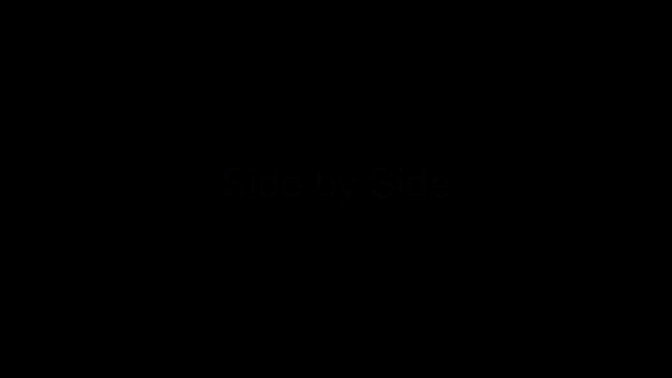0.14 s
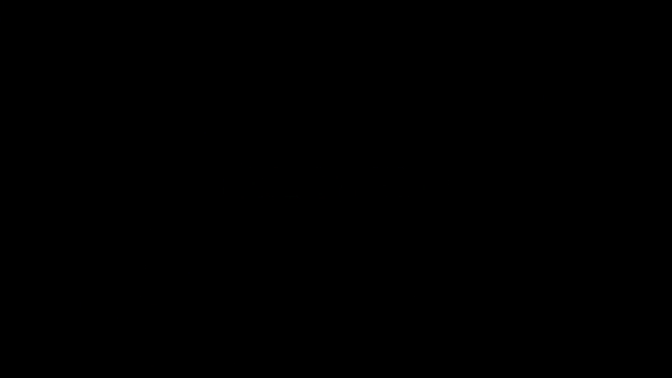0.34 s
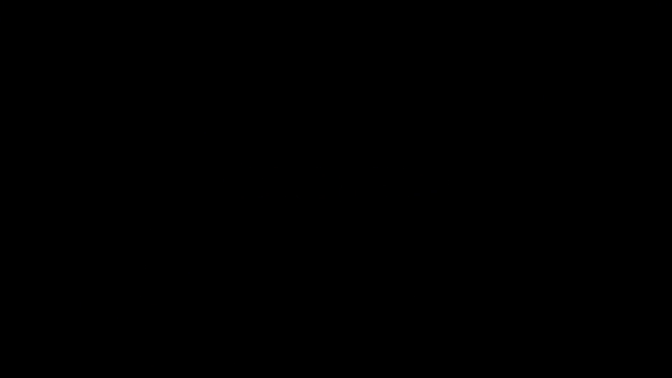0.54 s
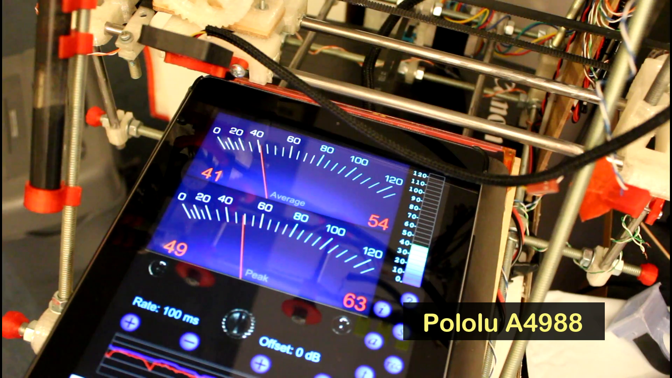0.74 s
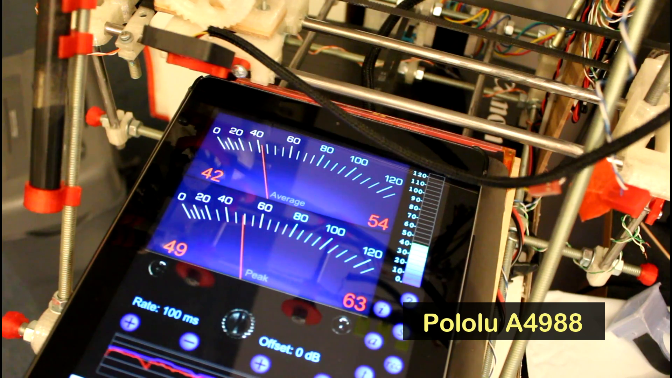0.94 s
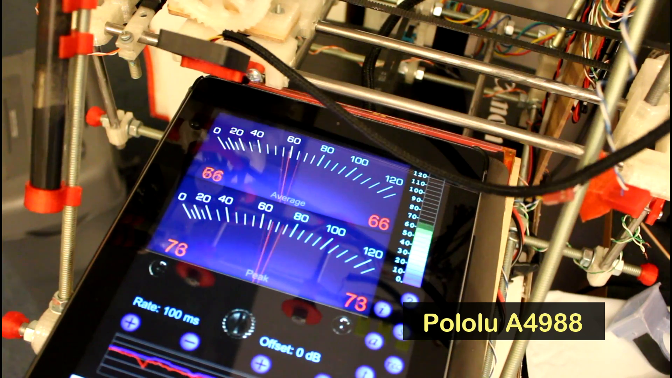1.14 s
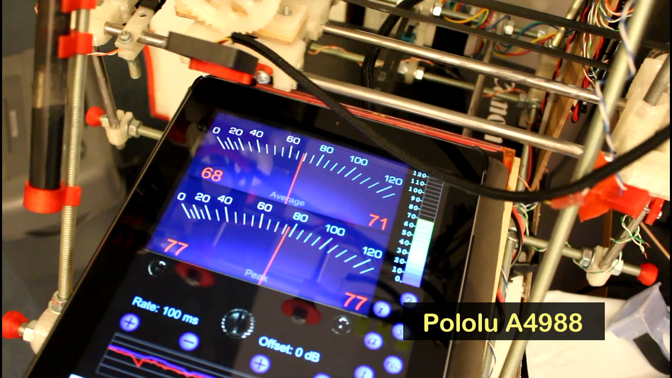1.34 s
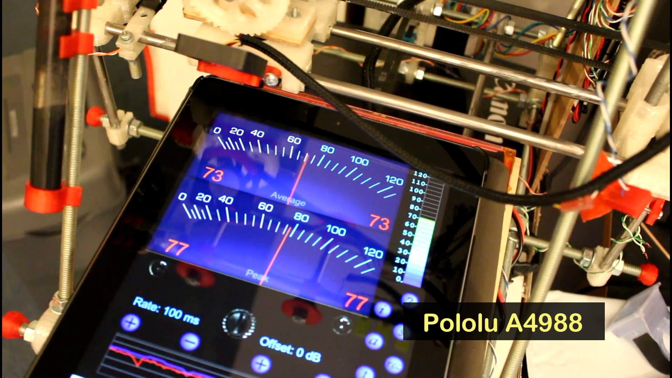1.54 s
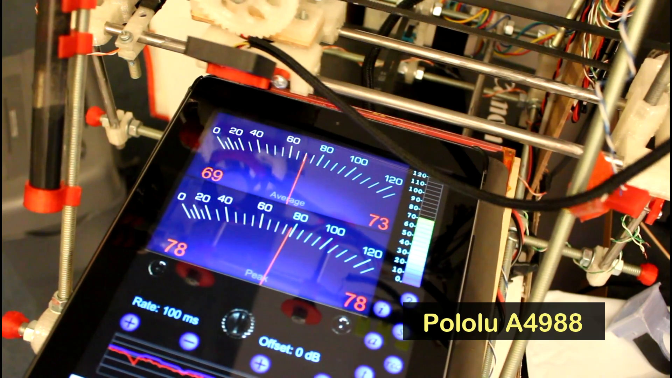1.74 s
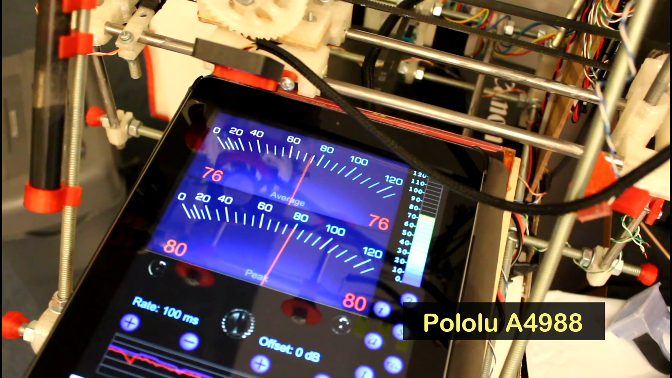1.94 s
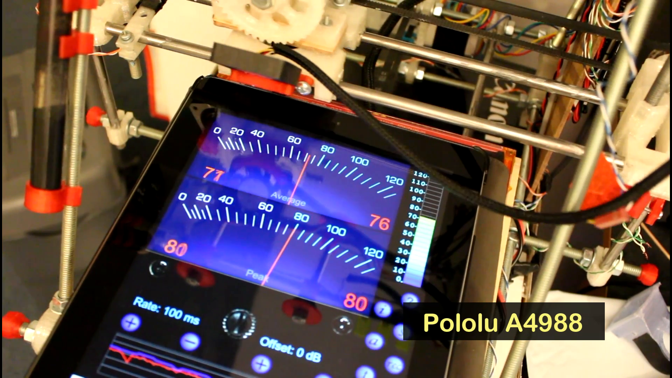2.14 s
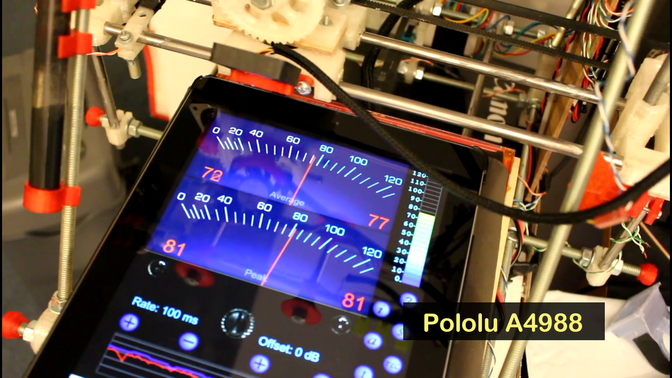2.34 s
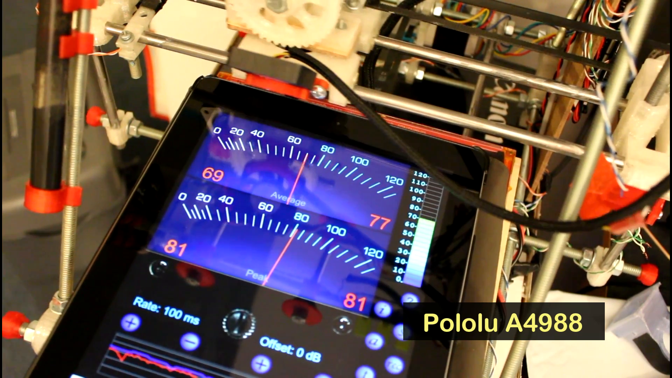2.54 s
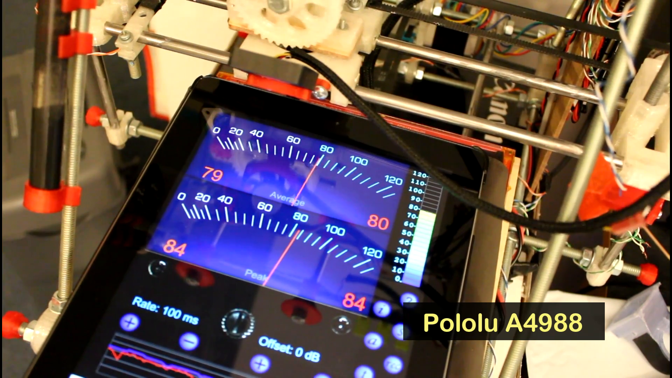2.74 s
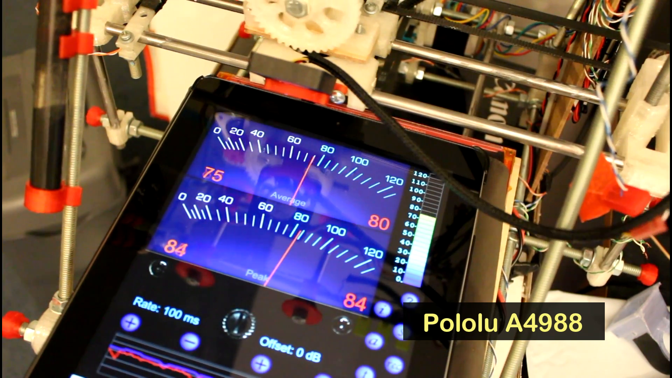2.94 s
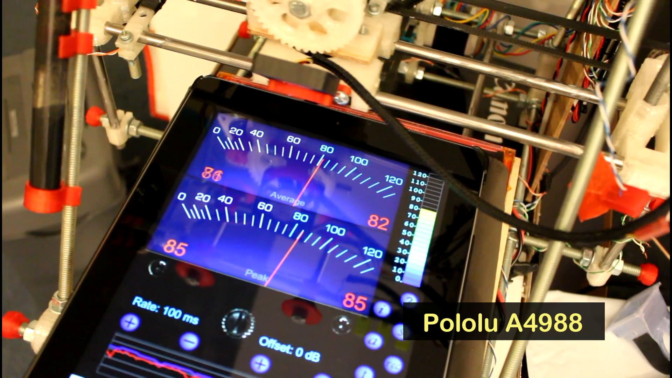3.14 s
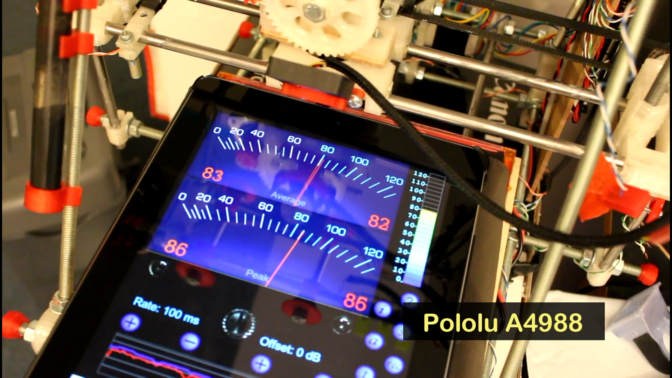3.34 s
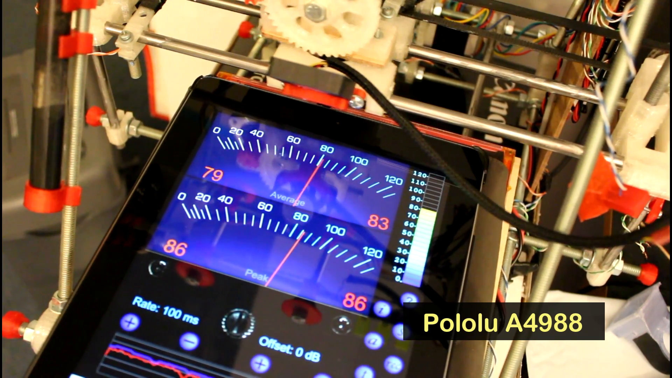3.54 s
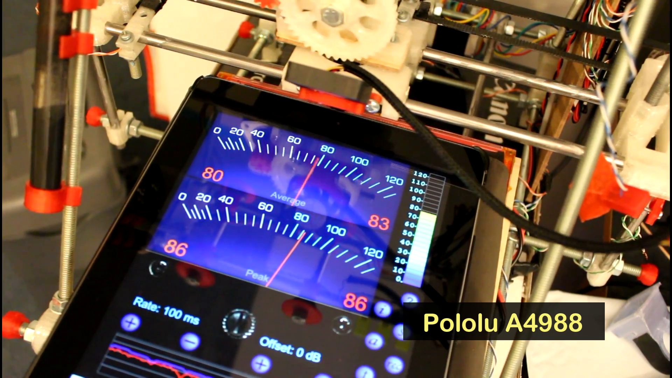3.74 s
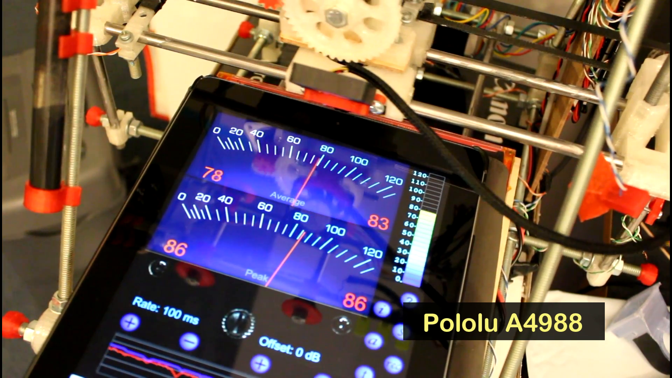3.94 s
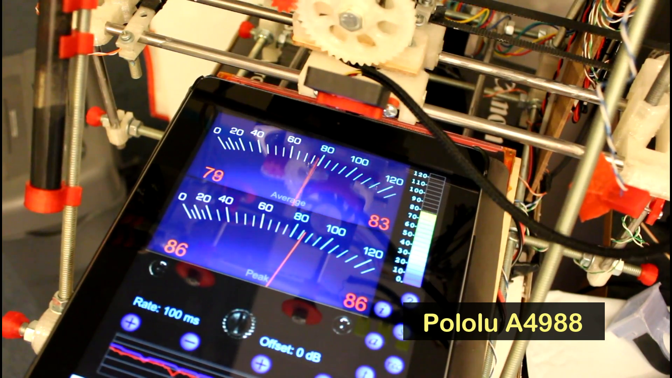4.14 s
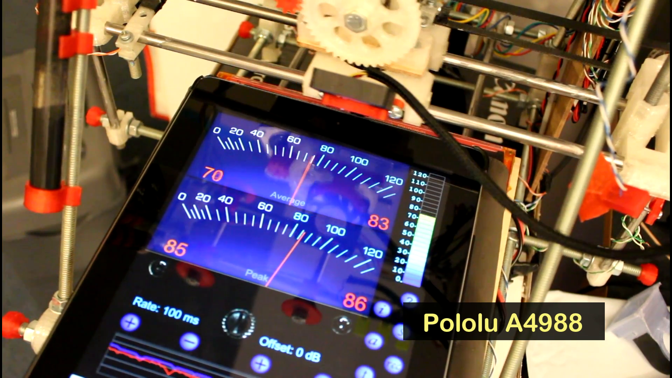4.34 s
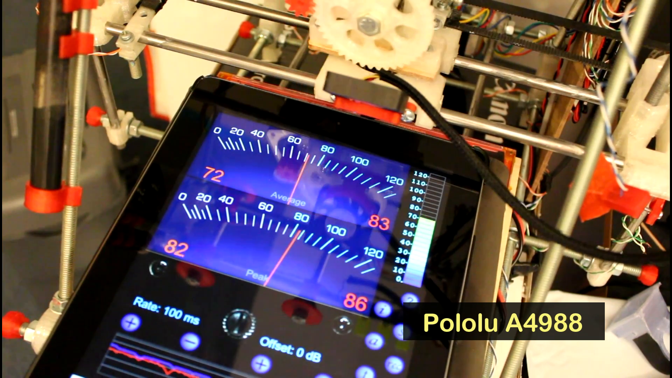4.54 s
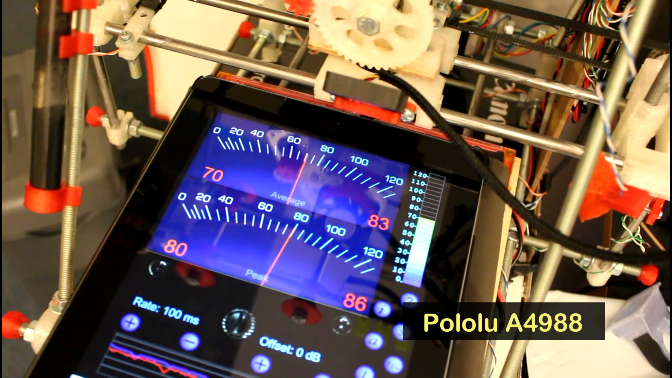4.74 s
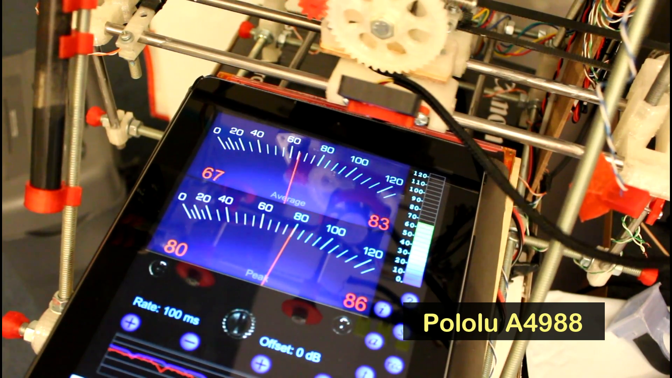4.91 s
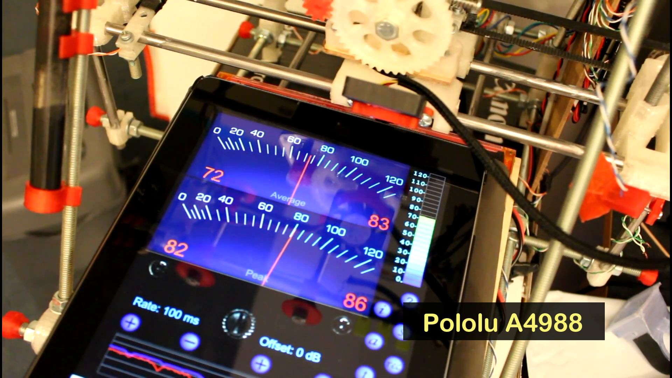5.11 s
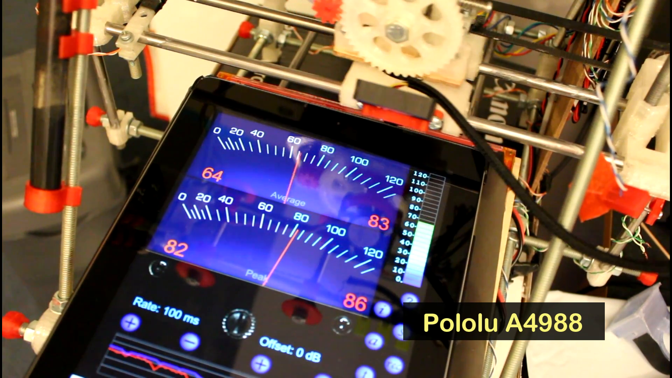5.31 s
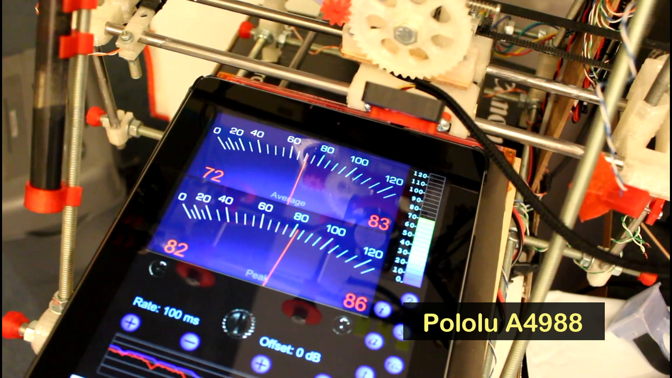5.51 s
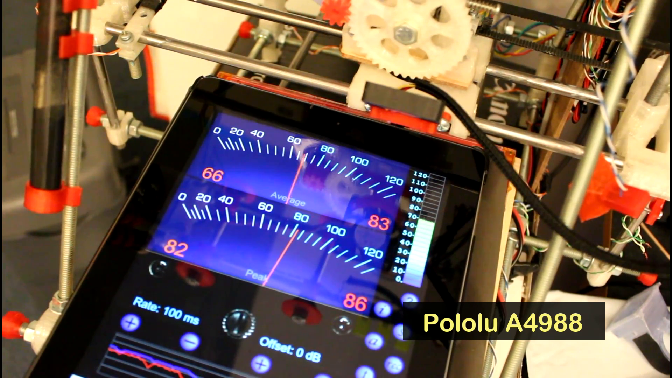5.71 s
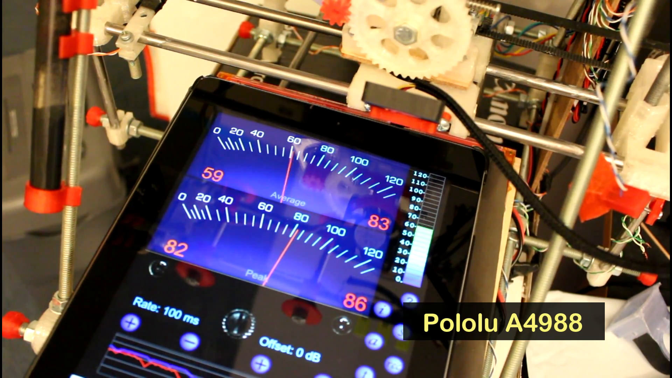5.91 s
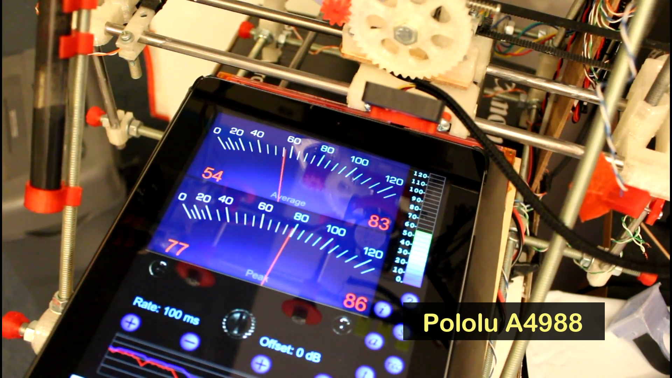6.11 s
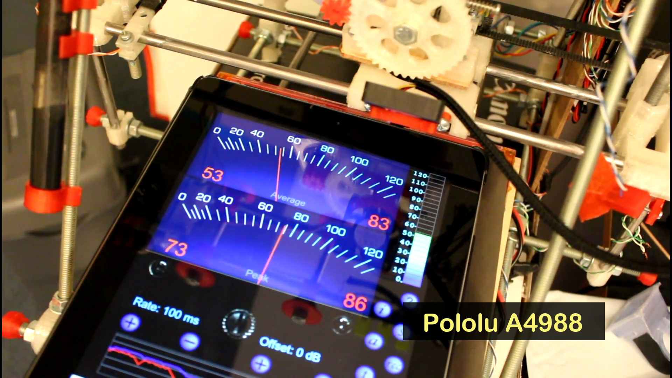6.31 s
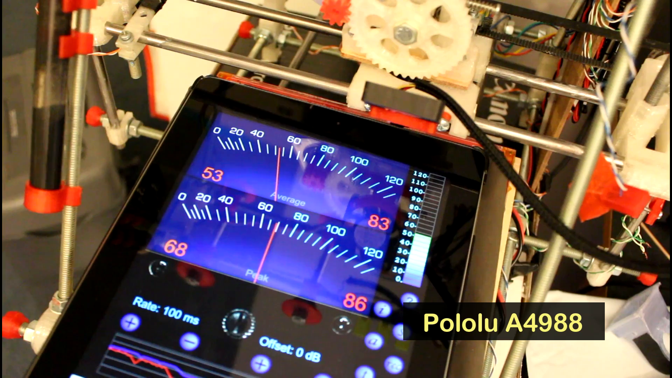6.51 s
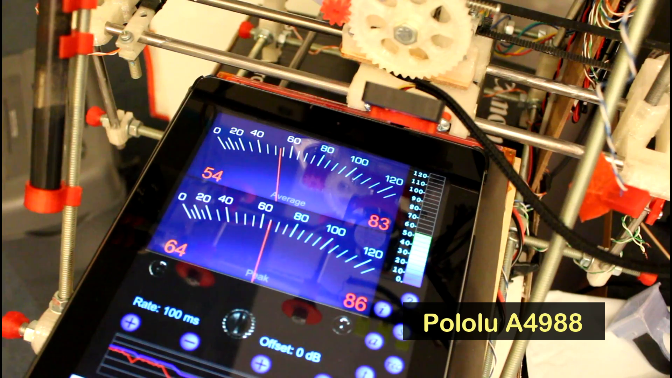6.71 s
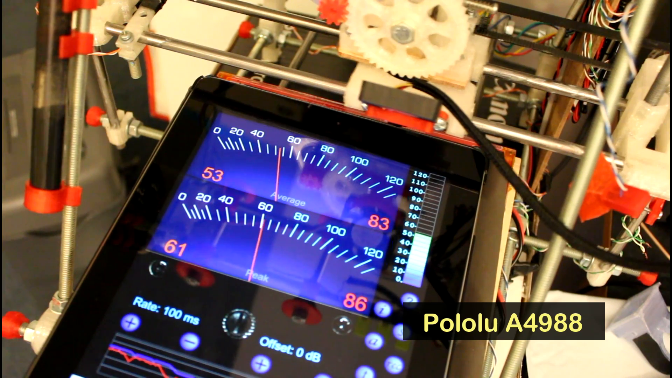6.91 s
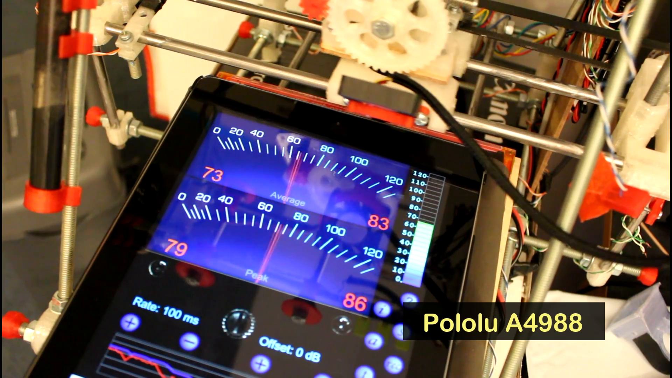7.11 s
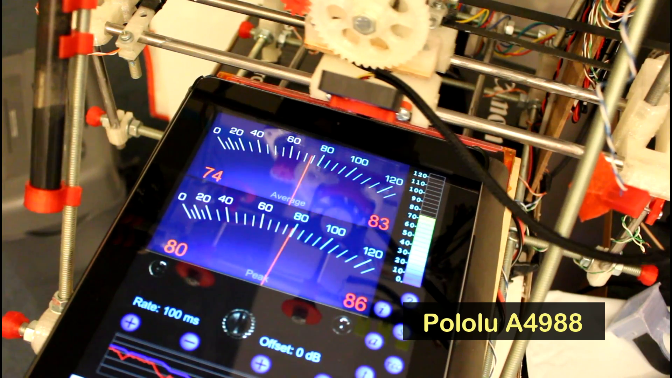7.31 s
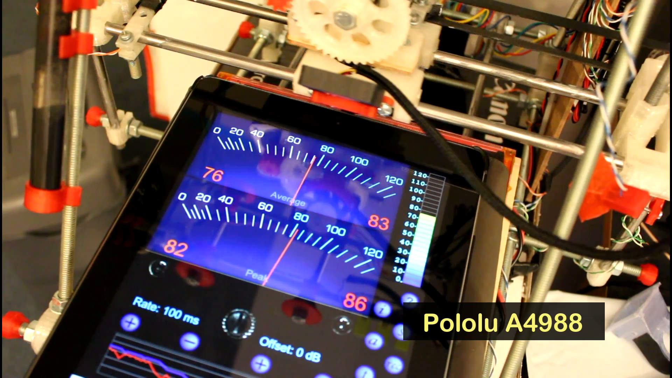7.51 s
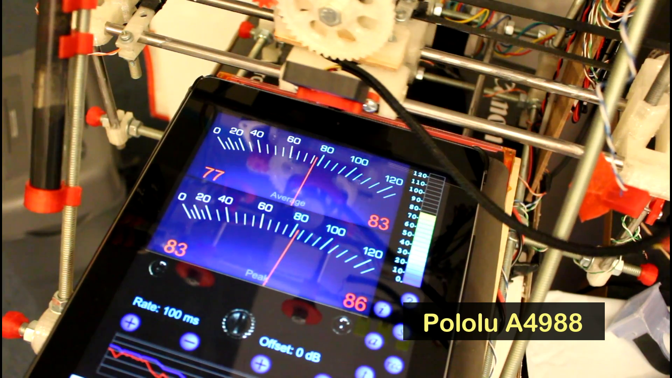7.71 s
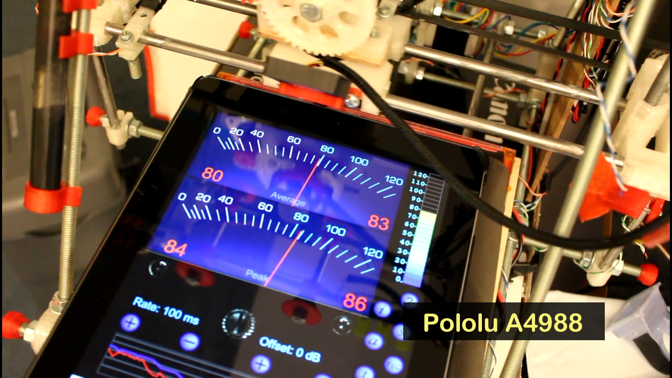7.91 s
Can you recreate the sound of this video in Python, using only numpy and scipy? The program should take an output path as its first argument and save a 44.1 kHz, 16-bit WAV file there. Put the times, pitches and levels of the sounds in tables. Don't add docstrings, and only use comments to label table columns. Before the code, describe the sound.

Abrupt quiet hum, a click and faint hiss, then a printer carriage buzzes in short nasal bursts, rests, and finally whines steadily to the end.

```python
import sys
import numpy as np
from scipy import signal
from scipy.fft import rfft, irfft, next_fast_len
from scipy.io import wavfile
from scipy.ndimage import uniform_filter1d, map_coordinates

SR = 44100
rng = np.random.default_rng(int(sys.argv[2]) if len(sys.argv) > 2 else 0)


def dump_mix(stems):
    frames = np.atleast_2d(stems).T
    limited = np.clip(frames, -1, 1)
    pcm = np.round(limited * 32767).astype(np.int16)
    wavfile.write(sys.argv[1], SR, pcm)


def amplitude_ratio(level_db):
    exponent = np.asarray(level_db, float) / 20
    return 10 ** exponent


N = 355446
T = np.arange(N) / SR

STEP_HZ = 277.55
RAMP_S = 0.044
SHORT_S = 0.215

# (start [s], step tone level [dB], its sag [dB], upper whine level [dB], rattle level [dB])
MOVES = [(1.008, -35, -1.5, 0, -47.5), (1.336, -35.5, -1, 0.5, -46.5), (1.706, -35.5, -1, 0, -46),
         (2.038, -33.5, 1, 2.5, -46), (2.443, -34, -1, 1, -44.5), (2.829, -35, -7.5, -2, -45),
         (3.201, -35, -6, -8, -45), (3.594, -34.5, -5.5, -3, -45), (3.98, -33.5, -9, -4, -44),
         (4.386, -34, -9, -4, -45), (4.845, -35, -8, -7, -45), (5.296, -37, -7, -6, -45.5),
         (6.962, -33.5, -8, -3, -45.5)]


def level(x, db):
    return x * amplitude_ratio(db) / np.sqrt(np.mean(x ** 2))


def curve(rows, column=1):
    rows = np.array(rows)
    return np.interp(T, rows[:, 0], rows[:, column])


def walk(rate):
    k = int(SR / rate)
    held = np.repeat(rng.standard_normal(N // k + 1), k)
    return 1.299 * uniform_filter1d(uniform_filter1d(held, k), k)[:N]


def ring(x, hz, t60):
    pole = np.exp((2j * np.pi * hz - np.log(1000) / t60) / SR)
    return signal.lfilter([1], [1, -pole], x).imag


def lag(x, tau_s):
    share = 1 / (tau_s * SR)
    return signal.lfilter([share], [1, share - 1], x)


def colour(x, points, peaks=()):
    size = next_fast_len(N)
    f = np.fft.rfftfreq(size, 1 / SR) + 1
    points = np.array(points)
    db = np.interp(np.log(f), np.log(points[:, 0]), points[:, 1])
    for hz, width, peak_db in peaks:
        db = db + peak_db / (1 + (2 * (f - hz) / width) ** 2)
    return irfft(rfft(x, size) * amplitude_ratio(db), size)[:N]


def spread(x, pan_db, wet_db, split_hz, t60):
    t = np.arange(SR // 5) / SR
    echo = rng.standard_normal((2, len(t))) * np.exp(-np.log(1000) * t / t60)
    echo = echo / np.sqrt(np.sum(echo[0] ** 2))
    echo = signal.lfilter(*signal.butter(2, split_hz, "high", fs=SR), echo)
    wet = signal.fftconvolve(x[None], echo, axes=1)[:, :N]
    return (x + amplitude_ratio(wet_db) * wet) * amplitude_ratio(np.array([[pan_db], [-pan_db]]) / 2)


def ramp_times():
    brake_lag_s = -0.003
    times = []
    for row in MOVES:
        times += [row[0], row[0] + SHORT_S + brake_lag_s]
    return times[:-1]


def move_now():
    rows = np.array(MOVES)
    latest = np.maximum(np.searchsorted(rows[:, 0], T) - 1, 0)
    rows = rows[latest].T
    return rows, np.maximum(T - rows[0], 0)


def motion():
    entry_share = 0.28
    belt_lag_s = 0.016
    command = np.zeros(N)
    for k, s in enumerate(ramp_times()):
        done = np.clip((T - s) / RAMP_S, 0, 1)
        jump = done >= 1 if k % 2 else done > 0
        command += (-1) ** k * ((1 - entry_share) * done + entry_share * jump)
    command = np.clip(command, 0, 1)
    speed = lag(command, belt_lag_s)
    pulses = np.cumsum(command * STEP_HZ) / SR
    steps = np.cumsum(speed * STEP_HZ * (1 + 0.0004 * walk(30))) / SR
    return command, pulses, speed, steps


def whine(speed, steps):
    # (multiple, level [dB], extra while settling [dB], climb [dB/s], share of the sag)
    main_lines = [(2, -50.5, 5, -4, -.5), (3, -52, -1.5, 5, .35), (4, -59.5, -3, 14, 0.054),
                  (5, -51.5, -3, 24, 0.52), (6, -55.5, -5, 9, .3), (7, -63, -2, -1, -0.018),
                  (8, -73, -5, 0, -0.061)]
    # (multiple, level [dB])
    weak_lines = [(9, -63), (10, -64), (11, -63), (12, -63), (13, -65), (14, -63), (15, -62), (17, -63),
                  (18, -66), (19, -66), (20, -65), (21, -65), (22, -68), (32, -78)]
    # (multiple, level [dB])
    quarter_lines = [(1.25, -60.5), (2.25, -62), (3.25, -67), (4.25, -72), (4.75, -59), (5.75, -78),
                     (10.25, -60.5), (18.25, -69)]

    def tone(k, db):
        return np.sqrt(2) * amplitude_ratio(db) * np.sin(2 * np.pi * (k * steps + rng.random()))

    (_, step_db, sag_db, upper_db, _), age = move_now()
    lock_s = 0.094 + 0.004 * sag_db
    lock_db = -13 * np.clip((lock_s - age) / 0.03, 0, 1)
    early = np.exp(-np.maximum(age - lock_s, 0) / 0.06)
    step_db = step_db + sag_db * (1 - early) + lock_db + 1.7 * walk(20)
    step = -np.sqrt(2) * amplitude_ratio(step_db) * np.cos(2 * np.pi * steps)

    climb_from_s, climb_to_s = 0.37, 0.79
    travel = np.clip(age, climb_from_s, climb_to_s) - climb_from_s
    span_hz = 2400 - 680 * age
    out = 0
    for k, db, early_db, climb, share in main_lines:
        k = round(k)
        db = db + early_db * early + climb * travel + share * sag_db + lock_db
        db = db + (k in (4, 6, 7, 8)) * upper_db
        span_db = (k > 6) * 15 / (1 + (2 * (k * STEP_HZ - span_hz) / 200) ** 2)
        out = out + tone(k, db + span_db + 1.06 * walk(12))

    build_db = 0.6 * (rattle_db() + 40.0)
    out += sum(tone(k, db + build_db + 1.8 * walk(5)) for k, db in weak_lines)
    quarters = sum(tone(k, db + 3.1 * walk(5.6)) for k, db in quarter_lines)
    out += lag(speed, 0.31) * quarters

    side_line_hz, side_line_start_s = 1362, 7.12
    side_line_db = -65 + 20.5 * (T - side_line_start_s)
    side_line = np.sqrt(2) * amplitude_ratio(side_line_db) * np.sin(2 * np.pi * side_line_hz * T) * (T > side_line_start_s)
    out = out * uniform_filter1d(speed ** 14, 300)
    return out + step * uniform_filter1d(speed ** 4, 300) + side_line


def microsteps(command, pulses):
    sag_db = move_now()[0][2]
    db = -64.5 - 0.8 * sag_db + 1.8 * walk(14)
    return np.sqrt(2) * amplitude_ratio(db) * np.sin(2 * np.pi * 16 * pulses) * command ** 7


def ramp_levels():
    # (near 170 Hz [dB], 279 Hz [dB], 342 Hz [dB], 402 Hz [dB], 1445 Hz [dB])
    start_peaks, start_scatter = (-38.5, -34.5, -46, -44.5, -49), (1.6, 0, 0, 0, 0.9)
    brake_peaks, brake_scatter = (-42.5, -22.5, -52, -47, -50.5), (2, .5, 1.5, 0, 1)
    # (start 279 Hz [dB], start 342 Hz [dB], start 402 Hz [dB], brake 402 Hz [dB])
    stances = [(2.5, 9, 0, 3.5), (-13, 1, 0, -8), (-12, 5.5, -17, 5), (6.5, -10, 2, -6),
               (-17, -2.5, -7, -2), (-7, 1.5, -3, -4), (3, -4, 4, 3.5), (-2, 0, -0.5, 0), (5, -7, 7, 2),
               (5.5, -1, -3.5, 4), (-16, 3.5, 4, -7), (2.5, 5, -3, 3.5), (3.5, -3.5, 6, 0)]
    chance = rng.standard_normal((2 * len(MOVES), 5)).clip(-2, 2)
    rule = np.array([[start_peaks, start_scatter], [brake_peaks, brake_scatter]] * len(MOVES))
    stance = []
    for a, b, c, d in stances:
        stance += [(0, a, b, c, 0), (0, 0, 0, d, 0)]
    return rule[:, 0] + rule[:, 1] * chance + stance


def frame(command, pulses, speed, steps):
    # (frequency [Hz], t60 [s], ramp level column [1-5], level against that column [dB])
    modes = [(171, 0.2, 1, -4.5), (219.6, 0.67, 1, -10), (278.8, 0.26, 2, -6.5), (340.8, 0.18, 3, 6),
             (397.3, 0.16, 4, 3.5), (483, 0.055, 4, -14), (590, 0.065, 4, -7), (775, 0.18, 5, -0.5),
             (974, 0.11, 5, 0), (1432, 0.11, 5, 2.5), (1445, 0.05, 5, -19), (4435, 0.13, 5, -6.5)]
    out, size = np.zeros(N + SR), SR // 3
    t = np.arange(size) / SR
    multiples = np.array([[1], [2], [3], [4], [6], [7]])
    weights = [1.0, 0.76, 0.85, 1.0, 0.55, 0.91]
    for s, row in zip(ramp_times(), ramp_levels()):
        now = slice(int(s * SR), int(s * SR) + size)
        phase = rng.random((6, 1))
        phase[0] = 0
        glide = np.sin(2 * np.pi * (multiples * steps[now] + phase))
        force = speed[now] ** 1.28 * np.dot(weights, glide)
        force += 1.5 * np.sin(2 * np.pi * 16 * pulses[now]) * (command[now] > 0)
        force += 12 * np.diff(rng.standard_normal(size), prepend=0)
        force *= np.clip(t / 0.0041, 0, 1) * np.clip((RAMP_S + 0.025 - t) / 0.017, 0, 1)
        for hz, t60, column, db in modes:
            y = ring(force, hz, t60)
            out[now] += y * amplitude_ratio(row[int(round(column)) - 1] + db) / np.abs(y).max()
    return signal.sosfilt(signal.butter(3, 85, "high", fs=SR, output="sos"), out[:N])


def shake(command):
    bench = [(40, -29), (90, 6.0), (300, 11.0), (600, -5.0), (1200, -17), (2000, -43)]  # (Hz, dB)
    changing = (command > 0) & (command < 1)
    jolt = lag(lag(changing, 0.0047), 0.054)
    return jolt * level(colour(rng.standard_normal(N), bench), -43.5)


def rattle_db():
    rows, age = move_now()
    rise = -6.5 * np.clip(1 - age / 0.12, 0, 1)
    fall = np.maximum(-280 * np.maximum(age - SHORT_S, 0), -18)
    return rows[4] + rise + fall * (T < MOVES[-1][0])


def rattle(speed, steps):
    # (frequency [Hz], level per Hz [dB])
    contact = [(80, -45), (150, -27), (700, -25), (1000, -28), (1550, -27), (2000, -22), (3500, -24),
               (4500, -26), (6000, -25), (6400, -30), (6800, -32), (10500, -35), (11500, -39), (15800, -44)]
    # (frequency [Hz], width [Hz], level [dB])
    rods = [(395.7, 11, 16.5), (1220, 460, 7.5), (2670, 130, 0.5), (5030, 110, 5), (5730, 480, 5.5),
            (7340, 480, 7), (9800, 500, 8.5)]
    pulse = 0.57 + np.exp(-(steps % 1) / 0.12)
    struck = rng.random(N) < 900 / SR
    strength = amplitude_ratio(2.5 * np.minimum(rng.exponential(size=N), 3))
    impacts = struck * strength * rng.uniform(-1, 1, N)
    x = level(pulse * rng.standard_normal(N), 0) + level(impacts, -5.5)
    x = colour(x, contact, rods)
    dull = signal.lfilter(*signal.butter(1, 4000, fs=SR), x)
    x = dull + (x - dull) * np.clip(1.46 * lag(speed, 0.038), 0, 1)
    moving = np.maximum(speed > 0.05, lag(speed > 0.05, 0.02))
    return level(x, 0.22) * amplitude_ratio(rattle_db() + 0.91 * walk(40)) * moving


def clicks():
    # (time [s], peak level [dB], pitch [Hz])
    snaps = [(0.987, -41.5, 3900), (1.117, -37, 4000), (1.3165, -43, 3200), (1.3531, -43, 4250),
             (1.686, -44, 4230), (1.7328, -38, 6300), (2.0176, -42.5, 3250), (2.4229, -41, 5960),
             (2.8083, -41.5, 3920), (3.1807, -40, 3700), (3.2433, -39.5, 4170), (3.5736, -41.5, 3600),
             (3.96, -39.5, 3260), (4.3658, -42.5, 3300), (4.395, -42.5, 3430), (4.825, -38.5, 3700),
             (5.2765, -40, 3730), (6.943, -39.5, 2820), (7.006, -38, 4470), (7.096, -36.5, 4440)]
    out, t = np.zeros(N), np.arange(1300) / SR
    for s, db, hz in snaps:
        chatter = rng.standard_normal(len(t)) * np.exp(-t / 0.004)
        shell = ring(chatter, hz, 0.0067)
        shell += 0.92 * ring(chatter, 5700, 0.0022)
        shell += 0.43 * ring(chatter, 10200, 0.0027)
        shell += 0.28 * ring(chatter, 1530, 0.0019)
        band = signal.butter(2, [1800, 9500], "band", fs=SR)
        y = signal.lfilter(*band, shell + 12 * chatter)
        a = int(s * SR)
        out[a:a + len(t)] += y * amplitude_ratio(db + 4) / np.abs(y).max()
    return out


def driver():
    # (frequency [Hz], width [Hz], level [dB])
    chopper = [(2380, 56, -77), (3580, 280, -69), (6110, 62, -74), (7800, 1900, -68), (8930, 380, -71.5),
               (9510, 140, -63), (10170, 220, -68), (10870, 280, -74.5), (12300, 1200, -72.5),
               (13800, 410, -70), (14800, 350, -78)]
    # (time [s], pitch ratio [1])
    warming = [(1.0, 1.02), (3.5, 1.012), (6.5, 1.0), (8.06, 1.0)]
    power_s = 1.004
    bands = 0
    for hz, width, db in chopper:
        bands = bands + level(ring(rng.standard_normal(N + SR), hz, 2.3 / width), db - 3.5)
    clock = np.cumsum(curve(warming))
    sung = map_coordinates(bands, [clock], order=2)
    return sung * amplitude_ratio(0.79 * walk(17)) * (T > power_s)


def room():
    # (frequency [Hz], level per Hz [dB])
    air = [(15, -35), (40, -16.5), (60, -13), (85, -9.5), (130, -8.5), (200, -6), (330, -10.5),
           (480, -13.5), (900, -17), (1600, -21), (3500, -23), (6500, -26), (10000, -31.5), (15600, -35)]
    # (frequency [Hz], level [dB])
    hum_lines = [(119.9, -59.5), (216, -71), (240, -67.5), (300, -66.5), (343, -68), (420, -70),
                 (15734, -84)]
    room_level_db = -55
    mid = level(colour(rng.standard_normal(N), air), room_level_db - 3.5) * amplitude_ratio(0.31 * walk(7.2))
    side = level(colour(rng.standard_normal(N), air, [(150, 320, -6.0)]), room_level_db - 2.5)
    hum = 0
    for hz, db in hum_lines:
        swell = amplitude_ratio(db - 3.5 + 2.0 * walk(7.1))
        hum = hum + np.sqrt(2) * swell * np.sin(2 * np.pi * (hz * T + rng.random()))
    return (mid + hum + side * np.array([[1], [-1]])) * amplitude_ratio(np.array([[-0.5], [0.5]]))


def scene():
    # (time [s], gain [dB])
    background_gain = [(.75, 0.5), (1.5, 2.5), (3, 2.5), (5.5, 3.5), (8.06, 0)]
    command, pulses, speed, steps = motion()
    motor = whine(speed, steps) + microsteps(command, pulses)
    motor = motor + frame(command, pulses, speed, steps) + shake(command)
    printer = spread(motor, pan_db=-1.75, wet_db=-6.5, split_hz=900, t60=0.24)
    loose = rattle(speed, steps) + clicks()
    parts = spread(loose, pan_db=-1.0, wet_db=-5.0, split_hz=1350, t60=0.094)
    hiss = spread(driver(), pan_db=-0.5, wet_db=-1.5, split_hz=2000, t60=0.14)
    return printer + parts + (hiss + room()) * amplitude_ratio(curve(background_gain))


def band_limit(x):
    return signal.sosfilt(signal.butter(12, 16270, fs=SR, output="sos"), x)


def record(dry):
    start_s, top_hz = 0.7565, 15780
    low_pass = signal.ellip(10, 0.3, 70, top_hz, fs=SR, output="sos")
    mix = signal.sosfilt(low_pass, dry * (T > start_s))
    return band_limit(mix)


dry = scene()
out = record(dry)
dump_mix(out)
```